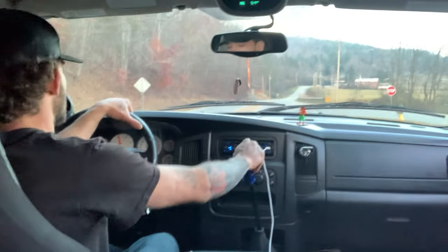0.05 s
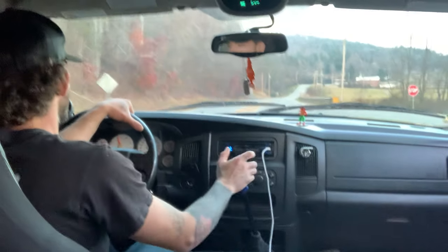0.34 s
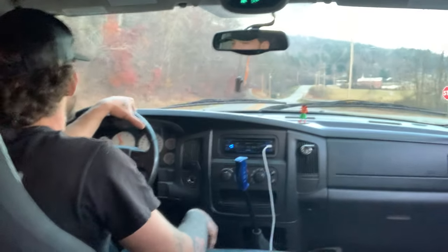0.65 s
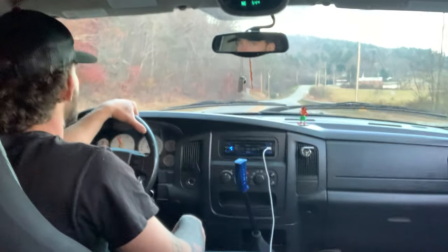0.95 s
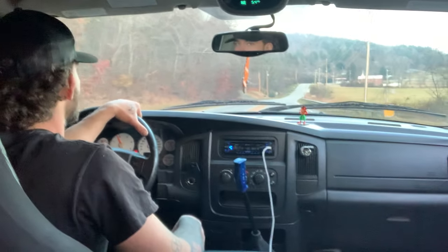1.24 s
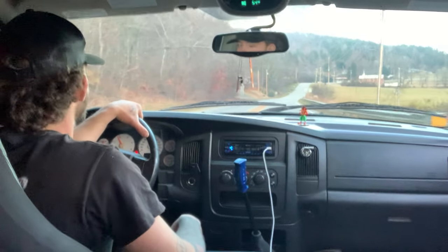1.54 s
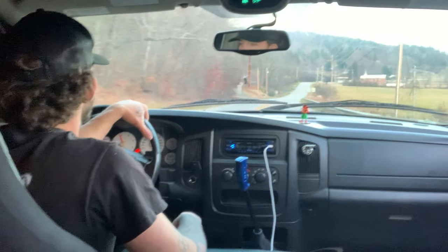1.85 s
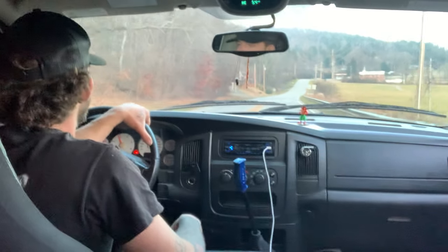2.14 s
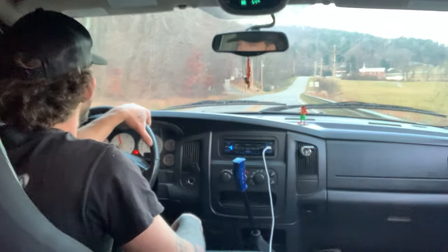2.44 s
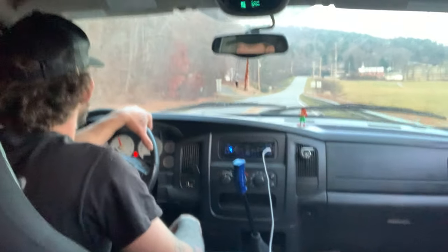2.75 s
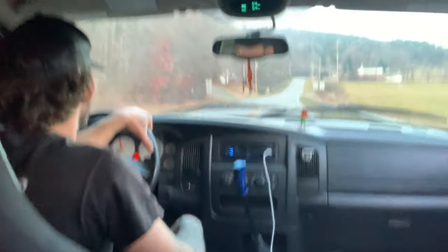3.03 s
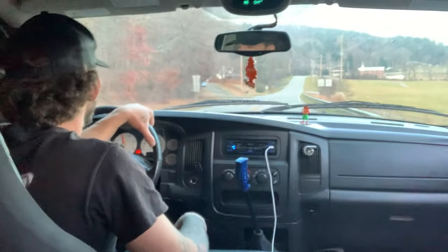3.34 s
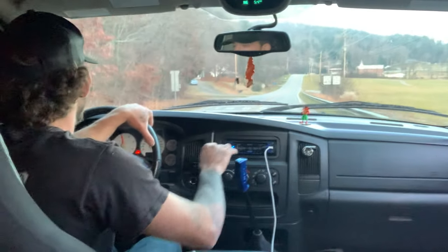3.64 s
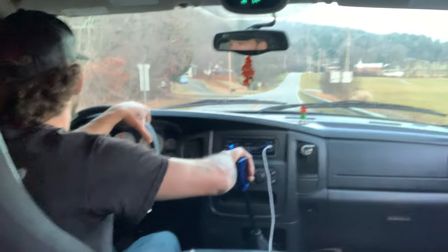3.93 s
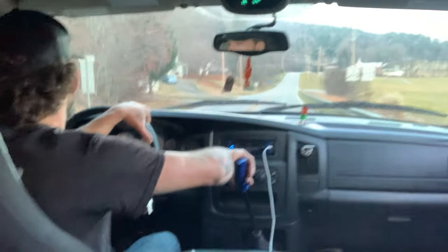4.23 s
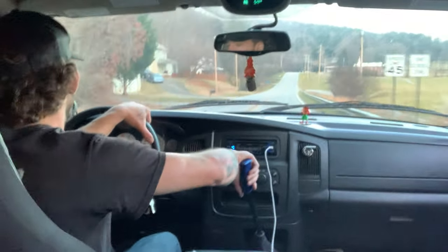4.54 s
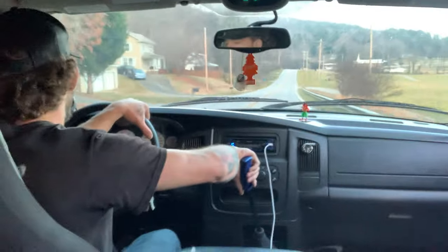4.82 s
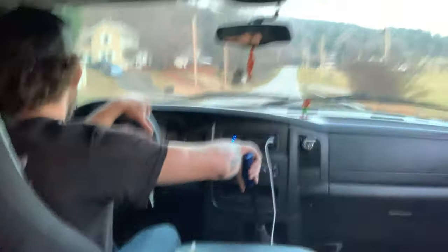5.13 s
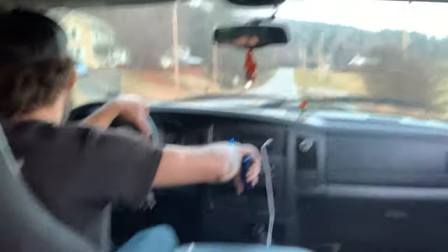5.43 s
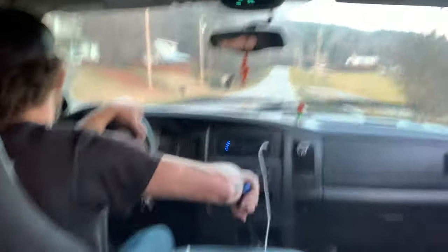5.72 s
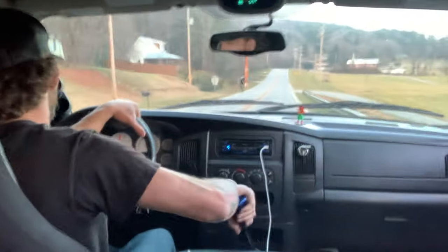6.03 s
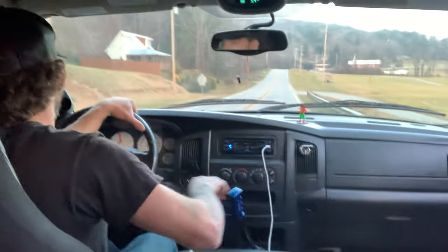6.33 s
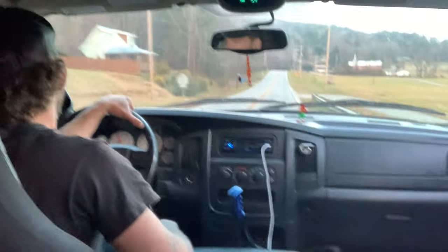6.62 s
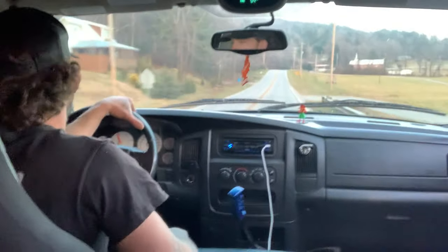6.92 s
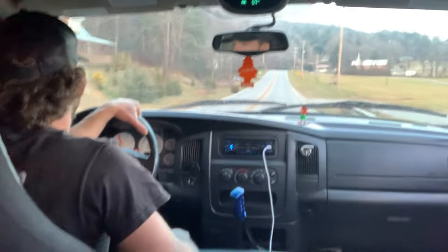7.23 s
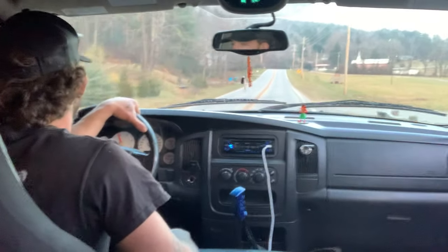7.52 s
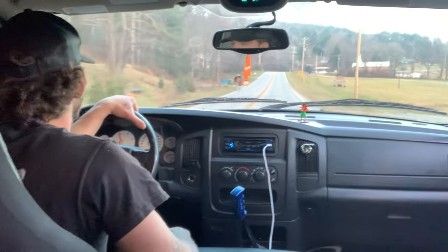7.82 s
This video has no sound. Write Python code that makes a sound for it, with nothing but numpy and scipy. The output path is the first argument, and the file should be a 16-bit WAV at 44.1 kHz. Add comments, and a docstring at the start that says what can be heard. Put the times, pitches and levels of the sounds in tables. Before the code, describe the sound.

A turbo-diesel truck accelerates along a road, with the microphone in the cab. The exhaust drone and engine clatter build as a thin, airy whistle rises very high and the trim rattles. Late on, the power cuts with a quick puff of air and the whistle falls. A low thud marks the gear change, then the engine takes up the load at lower revs, tyres rumbling throughout.

```python
"""A six-cylinder turbo-diesel pickup pulling hard through one gear, heard in the cab.
Three firings a crank turn make the exhaust boom and the block clatter; crank orders sweep through
resonances and shake loose panels. The turbo's breathy whistle and hiss climb with boost over road rumble.
The driver lifts off, the turbo chuffs and spins down, and the clutch takes up the next gear with a thud."""
import sys
import numpy as np
from scipy import signal
from scipy.fft import rfft, irfft, next_fast_len
from scipy.io import wavfile

SR = 44100
rng = np.random.default_rng(int(sys.argv[2]) if len(sys.argv) > 2 else 0)


def generate_wav(sig):
    """Save sig (samples, or channels by samples) to the path in sys.argv[1] as 16-bit PCM at SR."""
    pcm = np.round(np.clip(np.atleast_2d(sig).T, -1, 1) * 32767).astype(np.int16)
    wavfile.write(sys.argv[1], SR, pcm)


N = 351477
STEP = 32  # samples per control step
FFT_SIZE = next_fast_len(N, True)
TIME_S = np.arange(N) / SR
BIN_HZ = np.fft.rfftfreq(FFT_SIZE, 1 / SR)
CHUFF_S = 5.714

# Engine speed: pull, shift, next gear. Each row: time in seconds, firing rate in Hz.
FIRING_RATE = [(0, 106.9), (.1, 97.9), (.39, 86), (.54, 94), (.7, 90.8), (1.25, 93.2), (2.1, 98.5),
               (3.3, 107.3), (4.2, 114.3), (4.95, 121.9), (5.68, 132.2), (5.85, 129.4), (6, 119.6),
               (6.38, 104.5), (6.5, 96.6), (6.65, 95.1), (7.1, 95.5), (7.97, 98.5)]
# Accelerator. Each row: time in seconds, fuelling from 0 to 1.
FUELLING = [(0, 0.18), (.39, 0.07), (.45, 0.38), (1.1, 0.82), (5.27, 0.98), (5.33, 0.76), (5.56, 0.39),
            (5.68, 0.05), (6.28, 0), (6.38, 0.07), (6.7, 0.3), (7.3, 0.56), (7.97, 0.6)]
# Exhaust note in the cab at full load, then its octave. Each row: frequency in Hz, level in dB.
BOOM_LEVEL = [(88, -6.5), (97, -8.5), (109, -12), (124, -12), (133, -13)]
BOOM_OCTAVE_LEVEL = [(180, -24), (195, -25.5), (202, -16.5), (218, -19), (233, -16.5), (239, -27),
                     (245, -33), (253, -15.5), (265, -14)]
# Strong orders. Each row: multiple of crank speed, base level in dB, lift in dB when the exhaust drones.
STRONG_ORDERS = [(2, -29.5, 7.5), (2.5, -30, 11), (3.5, -38, 12.5), (4.0, -28.5, -2), (5.0, -26, 7.5),
                 (6.5, -32.5, 9), (7.0, -27, -12), (8.0, -30.5, 1.5), (9.0, -29.5, 11.5), (10.0, -39, 4),
                 (10.5, -41.5, 22), (11.0, -33, 12), (12.0, -30, 17.5), (12.5, -41.5, 13),
                 (13.0, -36.5, 11), (14.0, -24.5, -1.5), (15.0, -31.5, 2.5), (16.0, -42.5, 6),
                 (17.0, -36, 7), (18.0, -32, -6), (19.0, -32.5, -10.5), (20.0, -33.5, -6.5),
                 (21.0, -34.5, -10.5), (22.0, -35, -10.5), (23.0, -41.5, -11), (24.0, -44.5, -6.5),
                 (25.0, -41, -20), (26.0, -41, -35), (27.0, -48, 2), (28.0, -50, -6), (29.0, -50.5, -5),
                 (30.0, -50, -24), (31.0, -52.5, -1), (33.0, -55, 1), (35.0, -52, 0), (51.0, -49, 3)]
# Exhaust and cab air resonances and dips. Each row: centre in Hz, width in Hz, gain in dB.
AIR_RESONANCES = [(70.7, 18, 15.5), (189.4, 7.7, -24.5), (223, 6.6, 8), (233, 5.3, -5), (291, 13, 9.5),
                  (318, 9.9, 6), (383, 74, 5), (450, 16, -2.7), (455.4, 32, -8.5), (482, 770, -12),
                  (515, 40, 7.5), (582, 33, 5), (624, 42.0, -10), (671.6, 67, 20.5), (670.7, 29, -18.5),
                  (732, 14.0, -9.5), (808.9, 27, 10.5), (841, 10.7, -13), (916, 34, -9), (969, 298, 20.5),
                  (986, 21, -11), (1044, 14.0, -19), (1270, 110, 2.5)]
# Engine speeds that snarl. Each row: firing rate in Hz, width in Hz, weight.
SNARL_RATES = [(106.2, 1.4, 0.95), (129, 12, .55), (125.7, 2.6, .8)]
# Bands the snarl lifts. Each row: centre in Hz, width in Hz, gain in dB at weight 1.
SNARL_BANDS = [(735, 95, 6.9), (620, 45, 5)]
# Exhaust growl, block roar and injection clatter. Each row: frequency in Hz, relative level in dB.
GROWL_SPECTRUM = [(150, -17), (220, 8), (300, -11.5), (380, 5), (450, -7), (510, -12), (600, 0.5),
                  (720, -30), (1000, -57)]
BLOCK_SPECTRUM = [(420, -77), (600, -8), (650, -5.5), (820, 3), (900, 5), (1020, 1.5), (1110, -1),
                  (1280, 4.5), (1450, -4), (2000, -7), (2500, -20), (3200, -43)]
CLATTER_SPECTRUM = [(600, -27), (1100, 6), (1400, 0.5), (1700, -3), (1980, 0.5), (2500, -2), (3200, -4.5),
                    (4200, -5.5), (5200, -14.5), (6400, -14.5), (7300, -25.5), (8200, -15.5),
                    (12000, -29.5)]
# Swell of clatter and intake hiss together. Each row: time in seconds, gain in dB.
TREBLE_GAIN = [(0, 0), (4.35, 2.5), (4.75, 2), (4.95, -0.5), (5.18, -0.5), (5.26, 1.5), (5.34, -2),
               (5.56, 0), (5.7, 0.5), (5.95, 0), (6.2, -2.5), (6.5, 1.5), (7.97, 0)]
# Turbo speed. Each row: time in seconds, whistle pitch in Hz.
TURBO_PITCH = [(0, 4600), (.15, 4140), (.45, 3460), (.7, 3260), (1.4, 3810), (2.45, 4710), (2.7, 4915),
               (3.3, 5480), (3.7, 5960), (4.02, 6430), (4.3, 6965), (4.8, 8200), (5, 8650), (5.45, 9560),
               (5.62, 9800), (5.69, 9350), (5.73, 8400), (5.82, 8150), (5.9, 7150), (6.03, 6260),
               (6.2, 5400), (6.4, 4580), (6.8, 3850), (7, 3890), (7.5, 4260), (7.97, 4610)]
# Whistle reaching the cab. Each row: pitch in Hz, level in dB at half fuelling.
WHISTLE_LEVEL = [(3250, -58), (3480, -56), (3630, -42.5), (3700, -50), (3780, -42), (3960, -51),
                 (4070, -46), (4250, -53), (4440, -41.5), (4570, -52), (4730, -48), (4820, -60),
                 (4930, -43), (5050, -53), (5260, -56), (5390, -45), (5560, -48), (5730, -44), (5860, -45),
                 (6000, -41), (6170, -42), (6370, -34), (6700, -41), (7030, -50), (7500, -38), (7780, -42),
                 (8170, -31), (8520, -36), (8740, -32), (8880, -37), (9060, -29.5), (9380, -36),
                 (9800, -34)]
# Intake air. Each row: frequency in Hz, relative level in dB.
HISS_SPECTRUM = [(2500, -8), (4500, 4.5), (6400, 3), (7300, -5.5), (8400, 4), (9600, 1), (10600, 1.5),
                 (12000, 0), (14000, -2.5), (15000, -8.5)]
# Loose panel, then loose trim, at full load. Each row: firing rate in Hz, gain in dB.
BUZZ_GAIN = [(104, -58), (109, -33), (113, -26), (120.5, -55), (123, -26.5), (131, -32)]
RATTLE_GAIN = [(98, -44), (100.5, -29.5), (104.5, -32.5), (107, -37), (113, -32), (120, -39)]
# Resonances of that panel and trim. Each row: frequency in Hz, relative level in dB.
BUZZ_SPECTRUM = [(1150, -47), (1340, -46), (1400, -10.5), (1460, -24), (1700, -44)]
RATTLE_SPECTRUM = [(520, -52), (690, -16), (800, -9), (950, 3.5), (1060, 2.5), (1300, -30.5)]
# Road rumble. Each row: time in seconds, level in dB.
ROAD_LEVEL = [(0, -24), (.6, -19.5), (1.15, -31.5), (1.8, -22.5), (3.5, -21), (5.4, -23.5), (5.7, -22.5),
              (6.15, -22.5), (6.6, -19.5), (7.97, -21.5)]
# Body rumble, then a small tick. Each row: frequency in Hz, relative level in dB.
RUMBLE_SPECTRUM = [(20, -19), (40, -3), (62, 6.5), (80, -1), (110, -0.5), (160, -2.5), (225, -6),
                   (300, -12), (450, -24), (900, -56)]
TICK_SPECTRUM = [(6000, -30), (10000, -12), (12500, 0), (15000, 0)]
# Cab panel resonances. Each row: centre in Hz, width in Hz, gain in dB.
PANEL_RESONANCES = [(399, 44, 7), (495, 30, 15), (576.5, 40, 9.5), (655, 77, 9.5), (725, 61, 13),
                    (833, 140, 10.5), (1110, 105, -1), (1960, 46, 5), (2450, 49, 2), (3190, 93, 4),
                    (3440, 120, 0.5)]
# Cab standing waves. Each row: frequency in Hz, left-right correlation from -1 to 1.
STEREO_CORRELATION = [(30, .92), (70, .92), (95, .985), (125, .87), (175, .55), (200, .72), (235, .5),
                      (255, -.05), (295, -.2), (318, -.85), (360, .3), (400, -.3), (450, -.6), (485, 0),
                      (515, -.35), (555, -.9), (615, -.45), (660, -.95), (735, -.12), (795, -.9),
                      (870, -.05), (900, -.7), (930, -.3), (980, -.82), (1330, -.7), (1400, .62),
                      (1450, .45), (1520, -.5), (2100, -.04), (5000, .04), (6300, .32), (7300, -.5),
                      (8400, -.03), (10300, 0), (12000, .8), (14500, -.4)]
# Cab balance. Each row: frequency in Hz, left minus right in dB.
STEREO_BALANCE = [(30, 4), (75, 2.7), (110, 5.2), (170, 0), (250, 0), (285, 4.5), (320, -1.5), (357, 7),
                  (410, -1.5), (440, -.5), (468, -6), (495, -1), (535, .5), (575, -2), (625, 2), (700, -7),
                  (770, -.3), (830, -6), (900, -.5), (1100, -1), (1280, 1), (2330, -2), (4280, .5),
                  (7880, 3), (14500, 0)]


def exhaust_boom(crank_turns, crank_hz, force, flutter=0.017):
    """Three firings a turn: the exhaust note and its octave fill the cab."""
    hz, force = 3 * crank_hz, force[::STEP]
    note = partial(3 * crank_turns, hz, force * from_db(lookup(BOOM_LEVEL, hz)))
    octave = partial(6 * crank_turns, 2 * hz, force ** 2 * from_db(lookup(BOOM_OCTAVE_LEVEL, 2 * hz)))
    return (note + octave) * (1 + flutter * wander(30))


def engine_orders(crank_turns, crank_hz, fuel, drone, unsteady_db=2.54):
    """Firings and unequal cylinders give strong crank orders that swell through resonances."""
    out = np.zeros((2, N))
    fuel, drone = fuel[::STEP], drone[::STEP]
    snarl = fuel ** 2 * peaks(SNARL_RATES, 3 * crank_hz)
    for order, base_db, lift_db in STRONG_ORDERS:
        hz = order * crank_hz
        level_db = base_db + peaks(AIR_RESONANCES, hz) + lift_db * drone + snarl * peaks(SNARL_BANDS, hz)
        gain = fuel ** 1.2 * from_db(level_db + unsteady_db * wander(10, STEP))
        out += partial(order * crank_turns + rng.random(), hz, gain, ripple=0.1)
    return out


def growl_and_roar(crank_turns, firing_hz, fuel, drone, drone_db=7, coasting_db=-7, unsteady_db=3.5):
    """Exhaust growl and block roar: a comb of weaker orders, plus a rush of gas at each firing."""
    growl_db = -30 + drone_db * drone + coasting_db * np.exp(-fuel / 0.12)
    block_db = -37 + 4.5 * fuel + 8 * np.log2(firing_hz / 100)
    orders = np.setdiff1d(np.r_[np.arange(4.5, 30, .5), 30:56], [row[0] for row in STRONG_ORDERS])
    order_hz = orders[:, None] * (firing_hz[::STEP] / 3)
    half_order_db = -5 * (orders % 1 > 0)[:, None]
    gains = comb = 0
    for spectrum, level_db in ((GROWL_SPECTRUM, growl_db - 9), (BLOCK_SPECTRUM, block_db - 2)):
        shape = from_db(cab_db(spectrum, order_hz) + half_order_db)
        shape /= np.linalg.norm(shape, axis=0).mean()
        gains += from_db(level_db[::STEP]) * np.sqrt(fuel[::STEP]) * shape
    for order, hz, gain in zip(orders, order_hz, gains):
        cycles = order * crank_turns + rng.random()
        comb += partial(cycles, hz, gain * from_db(unsteady_db * wander(10.3, STEP)), ripple=0.3)
    puffs = unit_rms(1 + 0.52 * np.cos(6 * np.pi * crank_turns))
    growl_rush = from_db(growl_db - 6) * cab_noise(GROWL_SPECTRUM)
    block_rush = from_db(block_db - 4) * cab_noise(BLOCK_SPECTRUM)
    return comb + puffs * (growl_rush + block_rush)


def injection_clatter(crank_turns, fuel, boost, knock=0.1, fade_firings=0.31, flicker_db=1.1):
    """Bright block noise pulses unevenly at each injection, louder when boost and fuel come together."""
    firings = 3 * crank_turns
    strength = np.exp(0.21 * rng.standard_normal(2000))[firings.astype(int)]
    bursts = unit_rms(1 + knock * fuel * strength * np.exp(-(firings % 1) / fade_firings))
    level_db = -39.5 + boost * (4 + 7.5 * fuel) + flicker_db * wander(26)
    return from_db(level_db) * bursts * cab_noise(CLATTER_SPECTRUM)


def turbo_whistle(turbo_hz, fuel, boost, flicker_db=4.5, spent_db=-12, airy_hz=130, skirt_hz=480):
    """Compressor tone in a skirt of air noise; breaks up on fuel cut, dips once boost is spent."""
    breathy = np.clip(0.08 + boost * (0.28 + 0.67 * (1 - fuel) ** 6), 0, 1)
    waver = 0.00124 * wander(87)
    smear = 0.023 * breathy ** 4 * wander(400)
    cycles, hz = np.cumsum(turbo_hz * (1 + waver + smear)) / SR, turbo_hz[::STEP]
    tone = partial(cycles, hz, unit_rms(from_db(flicker_db * wander(17, STEP))))

    def noise_band(width_hz):
        return sum(partial(cycles + lag, hz, wander(width_hz, STEP)) for lag in (0, 1 / 4)) / np.sqrt(2)

    core = np.sqrt(1 - breathy) * tone + np.sqrt(breathy) * noise_band(airy_hz)
    skirt = from_db(-9) * noise_band(skirt_hz)
    octave = fuel * partial(2 * cycles, 2 * hz, from_db(-18) * wander(airy_hz, STEP))
    spent = envelope(CHUFF_S + 0.12, rise_s=0.32, hold_s=0.12, fade_s=1.1)
    level_db = lookup(WHISTLE_LEVEL, turbo_hz) + 5 * (fuel - 0.5) + spent_db * spent
    return from_db(level_db) * (core + skirt + octave)


def blade_rush(turbo_hz, fuel, db_per_octave=16, fade_above_hz=6500):
    """Blade-tip swirl under load: a wide and a faint narrow band below the whistle, fading at top speed."""
    cycles, hz = np.cumsum(turbo_hz) / SR, turbo_hz[::STEP]
    bands = 0
    for ratio, width_hz, gain in ((0.91, 520, 1), (0.937, 45, from_db(-7))):
        for lag in (0, 1 / 4):
            bands += gain * wander(width_hz) * partial(ratio * cycles + lag, ratio * hz, 1)
    fade = 1 / (1 + np.exp((turbo_hz - fade_above_hz) / 400))
    return fuel * fade * from_db(-48 + db_per_octave * np.log2(turbo_hz / 4500)) * bands


def intake_hiss(turbo_hz, fuel, spool_hz, choke_hz=8300, db_per_octave=18, flicker_db=1.0):
    """Air through the turbo: louder with fuelling, and with speed until the flow levels off."""
    spin_octaves = np.log2(np.minimum(turbo_hz, choke_hz) / spool_hz)
    level_db = -62 + db_per_octave * spin_octaves + 6 * fuel + flicker_db * wander(26)
    return from_db(level_db) * cab_noise(HISS_SPECTRUM)


def turbo_chuff(start_hz=486, sag_hz_per_s=1140, rise_s=0.014, hold_s=0.031, roughness=0.0596):
    """Trapped boost blows back through the compressor: a short falling hoot and a puff of air."""
    hz = start_hz - sag_hz_per_s * np.clip(TIME_S - CHUFF_S, 0, 2 * hold_s + rise_s)
    cycles = np.cumsum(hz * (1 + roughness * wander(184))) / SR
    hoot = sum(partial(k * cycles, hz[::STEP], from_db(db)) for k, db in ((1, 0), (2, -8), (3, -25)))
    air = from_db(-16) * cab_noise(CLATTER_SPECTRUM) + from_db(-14) * cab_noise(HISS_SPECTRUM)
    return from_db(-20.5) * envelope(CHUFF_S, rise_s, hold_s, fade_s=0.012) * (hoot + air)


def panel_buzz(crank_turns, crank_hz, firing_hz, force, flicker_db=2):
    """High crank orders ring a loose panel in turn as they pass its note."""
    tones = 0
    for order in range(32, 43):
        cycles, hz = order * crank_turns + rng.random(), order * crank_hz
        tones += partial(cycles, hz, from_db(lookup(BUZZ_SPECTRUM, hz) + flicker_db * wander(20, STEP)))
    pulses = unit_rms(1 + .5 * np.cos(6 * np.pi * crank_turns))
    rush = from_db(-7) * pulses * cab_noise(BUZZ_SPECTRUM)
    return force * from_db(lookup(BUZZ_GAIN, firing_hz)) * (tones + rush)


def trim_rattle(crank_turns, firing_hz, fuel, flicker_db=5.5):
    """Loose trim chatters once a crank turn under load."""
    beats = unit_rms(1 + 0.32 * np.cos(2 * np.pi * crank_turns))
    level_db = lookup(RATTLE_GAIN, firing_hz) + flicker_db * wander(27)
    return fuel * from_db(level_db) * beats * cab_noise(RATTLE_SPECTRUM)


def clutch_thud(start_s=6.325, level_db=-18):
    """The drive line takes up the next gear and jolts the body."""
    jolt = envelope(start_s, rise_s=0.042, hold_s=0, fade_s=0.093)
    return from_db(level_db) * jolt * cab_noise(RUMBLE_SPECTRUM)


def road_rumble(bumps_db=1.0):
    """Tyres and body rumble, swelling over bumps."""
    return from_db(follow(ROAD_LEVEL) - bumps_db * wander(15)) * cab_noise(RUMBLE_SPECTRUM)


def cab_tick(start_s=1.821, level_db=-40):
    """Something small and loose ticks once."""
    tick = envelope(start_s, rise_s=0.0015, hold_s=0, fade_s=0.004)
    return from_db(level_db) * tick * cab_noise(TICK_SPECTRUM)


def partial(cycles, hz, gain, ripple=0):
    """Stereo sine; standing waves shift each side's level and phase. hz and gain come once a STEP."""
    grid_hz = np.arange(0, 12000, 22)
    waves = np.array([np.interp(hz, grid_hz, row) for row in rng.standard_normal((4, len(grid_hz)))])
    apart_rad = np.arccos(np.clip(lookup(STEREO_CORRELATION, hz), -1, 1))
    level = gain * side_gains(hz) * np.exp(ripple * waves[:2] - ripple ** 2 / 2)
    phase = ripple * waves[2:] - np.array([[1], [0]]) * apart_rad
    level, phase = (np.repeat(np.float32(v), STEP, 1)[:, :N] for v in (np.sqrt(2) * level, phase))
    return level * np.cos(np.float32(2 * np.pi * (cycles - np.floor(cycles))) + phase)


def cab_noise(spectrum):
    """Stereo noise of rms 1, coloured by the cab."""
    left, spare = rfft(rng.standard_normal((2, FFT_SIZE)))
    correlation = np.clip(lookup(STEREO_CORRELATION, BIN_HZ), -1, 1)
    right = correlation * left + np.sqrt(1 - correlation ** 2) * spare
    shaped = np.array([left, right]) * side_gains(BIN_HZ) * from_db(cab_db(spectrum, BIN_HZ))
    return unit_rms(irfft(shaped, FFT_SIZE)[:, :N])


def cab_db(spectrum, hz):
    """Source spectrum plus panel resonances."""
    return lookup(spectrum, hz) + peaks(PANEL_RESONANCES, hz)


def side_gains(hz):
    """Left and right gains."""
    return from_db(np.array([[.5], [-.5]]) * lookup(STEREO_BALANCE, hz))


def peaks(resonances, hz):
    """Sum of resonance curves at hz."""
    return sum(height / (1 + (2 * (hz - centre) / width) ** 2) for centre, width, height in resonances)


def wander(rate_hz, step=1):
    """Smooth random curve of rms 1, one value every step samples."""
    size = FFT_SIZE // STEP
    hz = np.fft.rfftfreq(size, STEP / SR)
    slow = unit_rms(irfft(rfft(rng.standard_normal(size)) / (1 + (hz / rate_hz) ** 4), size))
    return np.interp(TIME_S[::step], np.arange(size) * STEP / SR, slow)


def envelope(start_s, rise_s, hold_s, fade_s):
    """Linear rise, hold, exponential fade."""
    age_s = TIME_S - start_s
    return np.clip(age_s / rise_s, 0, 1) * np.exp(-np.maximum(age_s - rise_s - hold_s, 0) / fade_s)


def follow(table):
    """A time table at every sample."""
    return np.interp(TIME_S, *np.transpose(table))


def lookup(table, hz):
    """Interpolates on a log-frequency axis."""
    table_hz, values = np.transpose(table)
    return np.interp(np.log(hz + 1), np.log(table_hz + 1), values)


def from_db(db):
    return 10 ** (np.asarray(db) / 20)


def unit_rms(x):
    return x / np.sqrt(np.mean(abs(x) ** 2) + 1e-20)


def scene(spool_hz=3070, full_boost_hz=6980, drone_above_hz=110.5, drone_width_hz=2.2):
    """Firing rate, fuelling and turbo speed drive engine and turbo; engine layers share one crank."""
    firing_hz, turbo_hz = follow(FIRING_RATE), follow(TURBO_PITCH)
    fuel = np.clip(follow(FUELLING), 0, 1)
    force = np.sqrt(fuel + 0.0061)  # firing strength, above zero even when coasting
    boost = np.log2(np.minimum(turbo_hz, full_boost_hz) / spool_hz)
    drone = np.sqrt(fuel) / (1 + np.exp((drone_above_hz - firing_hz) / drone_width_hz))
    crank_turns = np.cumsum(firing_hz / 3 * (1 + 0.00092 * wander(10.3))) / SR
    crank_hz = firing_hz[::STEP] / 3
    treble = from_db(follow(TREBLE_GAIN))
    engine = exhaust_boom(crank_turns, crank_hz, force) + engine_orders(crank_turns, crank_hz, fuel, drone)
    engine += growl_and_roar(crank_turns, firing_hz, fuel, drone)
    engine += treble * injection_clatter(crank_turns, fuel, boost)
    loose_parts = panel_buzz(crank_turns, crank_hz, firing_hz, force)
    loose_parts += trim_rattle(crank_turns, firing_hz, fuel)
    turbo = turbo_whistle(turbo_hz, fuel, boost) + blade_rush(turbo_hz, fuel)
    turbo += treble * intake_hiss(turbo_hz, fuel, spool_hz) + turbo_chuff()
    return engine + turbo + loose_parts + clutch_thud() + road_rumble() + cab_tick()


def record(dry, knee=0.75, headroom=0.2, cutoff_hz=15150):
    """Soft peak clipping, then a low-pass."""
    over = np.maximum(abs(dry) - knee, 0)
    rounded = dry - np.sign(dry) * (over - headroom * np.tanh(over / headroom))
    lowpass = signal.firwin(511, cutoff_hz, window=("kaiser", 9), fs=SR)
    return signal.oaconvolve(rounded, lowpass[None], "same")


dry = scene()
out = record(dry)
generate_wav(out)
```